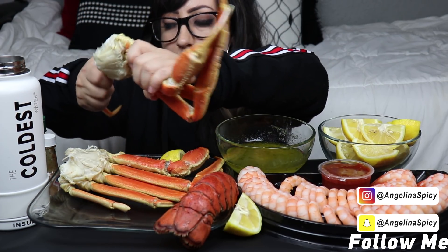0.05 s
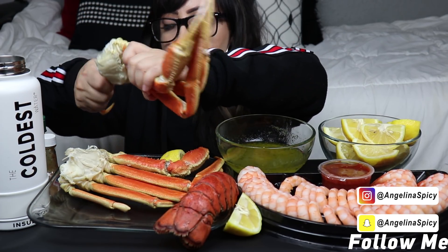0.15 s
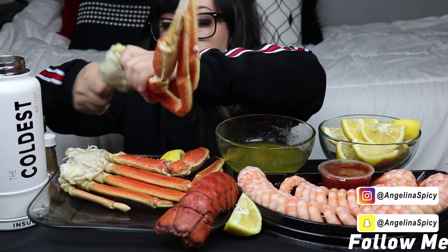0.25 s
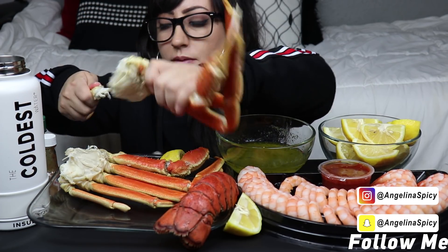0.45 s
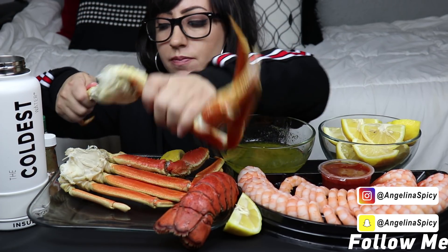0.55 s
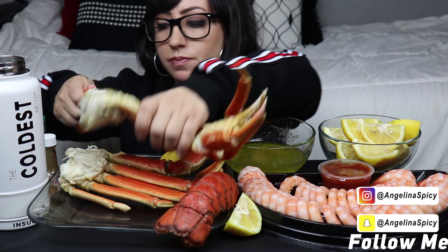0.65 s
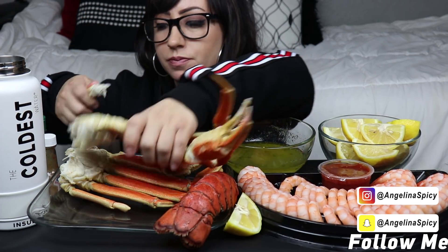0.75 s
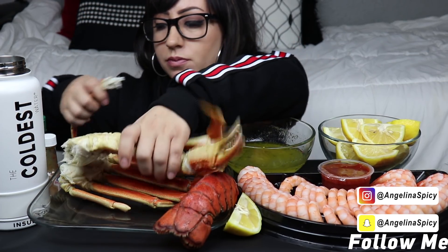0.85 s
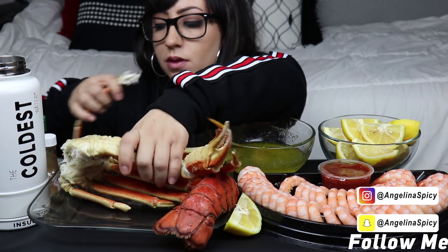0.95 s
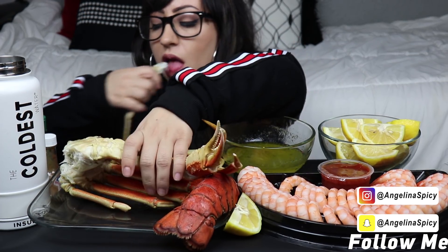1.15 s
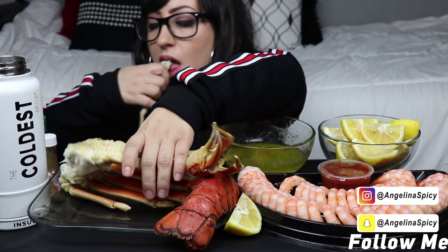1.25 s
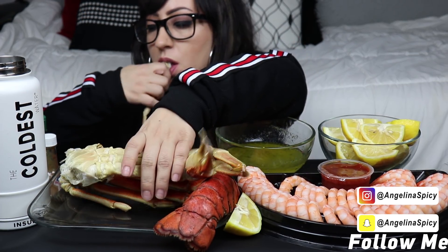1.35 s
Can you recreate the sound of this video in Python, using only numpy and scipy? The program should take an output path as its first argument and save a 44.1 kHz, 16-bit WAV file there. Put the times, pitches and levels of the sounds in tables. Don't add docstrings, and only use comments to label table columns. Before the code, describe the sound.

Crab leg shell being broken by hand, close to the microphone in a soft furnished room. Small ticks start at once, growing from 0.17 seconds into crowded brittle snaps, loudest at 0.34. A dull table knock and low creak follow around 0.4 to 0.6, then near quiet. At 0.93 the leg clacks onto a tray; low rumbling sway, wet rustling and faint ticks continue to 1.4.

```python
import sys
import numpy as np
from scipy import signal
from scipy.fft import rfft, irfft
from scipy.io import wavfile

SR = 44100
rng = np.random.default_rng(int(sys.argv[2]) if len(sys.argv) > 2 else 0)


def elevation(decibels):
    levels = np.asarray(decibels, float)
    return 10 ** (levels / 20)


def materialize(psi):
    bounded = np.clip(np.atleast_2d(psi).T, -1, 1)
    quanta = np.round(bounded * 32767).astype(np.int16)
    wavfile.write(sys.argv[1], SR, quanta)


N = 61739
LEAD = 4410


def rms_one(x):
    return x / np.sqrt(np.mean(x ** 2) + 1e-20)


def in_time(rows):
    return np.interp(np.arange(N) / SR, *np.transpose(rows))


def at_hz(points, hz, axis=1):
    points = np.array(points)
    return np.interp(np.log(np.maximum(hz, 1)), np.log(points[:, 0]), points[:, axis])


def colour(x, points):
    gain = elevation(at_hz(points, np.fft.rfftfreq(len(x), 1 / SR)))
    return rms_one(irfft(rfft(x) * gain, len(x)))


def drift(rate_hz):
    r = np.exp(-2 * np.pi * rate_hz / SR)
    settle = 9000
    return rms_one(signal.lfilter([1], [1, -2 * r, r * r], rng.standard_normal(N + settle))[settle:])


def band_pass(x, low_hz, high_hz):
    return signal.sosfilt(signal.butter(2, [low_hz, high_hz], "band", fs=SR, output="sos"), x)


def add(out, start_s, x):
    i = int(start_s * SR) + LEAD
    out[i:i + len(x)] += x[:len(out) - i]


def ring(t, hz, t60):
    return np.sin(2 * np.pi * hz * t) * elevation(-60 * t / t60)


def snaps():
    # (time [s], peak level [dB], pitch of
    # hollow leg [Hz], bright crack against ring [dB])
    snap_table = [(-.04, -24, 2900, 5), (0.0551, -33, 5270, 4), (0.0653, -48, 4513, 9),
                  (0.0937, -31.5, 3570, 4.5), (0.1297, -51, 4900, 14), (.136, -44.5, 3900, -1),
                  (0.1704, -20.5, 1900, 2.5), (0.165, -42, 4000, 1.5), (0.2115, -15.5, 1840, 3),
                  (.2231, -20.5, 1500, 7), (.245, -14.5, 1476, 2), (.257, -22, 1179, -15),
                  (.2949, -13.5, 1120, 7), (0.2977, -13.5, 1130, 5), (.302, -18.5, 1160, 0),
                  (0.3174, -18, 1296, -12), (.3368, -5.5, 1032, -0.5), (0.3402, -6, 1720, -1),
                  (0.504, -41, 3000, 0), (0.662, -56.5, 1234, 1.5), (.9286, -13, 1346, -9),
                  (0.9364, -26, 4260, -4), (0.9626, -24, 1760, -3.5), (.973, -38, 3900, -16),
                  (1.058, -37, 1900, 1), (1.0917, -40, 1005, -9.5), (1.176, -62, 6000, 8),
                  (1.3238, -42, 4000, 5.5), (1.398, -37.5, 1160, -10)]
    # (frequency [Hz], level [dB], time to die by 60 dB [s])
    wall_modes = [(1900, -4.5, .006), (3033, -5.5, 0.0079), (3706, -0.5, .005), (4463, -1.5, 0.0061),
                  (5210, -5, 0.0044), (6376, 2, .004), (8006, -0.5, 0.0038), (9960, -4.5, 0.0025),
                  (11320, -4.5, 0.0032), (14200, -4, .002)]
    cycles = 9.34
    out, t = np.zeros(N + LEAD), np.arange(2000) / SR
    luck = rng.standard_normal((len(snap_table), 3, len(wall_modes)))
    shape = (len(snap_table), len(t))
    bits = rng.standard_normal(shape) * rng.exponential(1, shape)
    bits = signal.sosfilt(signal.butter(1, 6000, fs=SR, output="sos"), bits)
    for (start_s, db, hz, crack_db), (loud, tune, late), splinters in zip(snap_table, luck, bits):
        x = ring(t, hz, cycles / hz) + elevation(-4) * ring(t, hz * 0.6, cycles / hz)
        x = x + splinters * elevation(crack_db - 14.5 - 60 * t / 0.017)
        for (wall_hz, wall_db, t60), a, b, c in zip(wall_modes, loud, tune, late):
            since = np.maximum(t - .00012 * abs(c), 0)
            strength = np.sign(b) * elevation(crack_db + wall_db - 7.5 + 1.5 * a)
            x = x + strength * ring(since, wall_hz * (1 + 0.048 * b), t60)
        add(out, start_s, -elevation(db) * x)
    return signal.sosfilt(signal.butter(6, 798, "high", fs=SR, output="sos"), out)


def echoes(x):
    # (frequency [Hz], time to die by 60 dB [s], level [dB])
    room_bands = [(300, .3, -19.5), (700, 0.3, -18), (1500, 0.32, -9), (3000, 0.39, -8), (6000, 0.38, -10),
                  (10000, 0.24, -6.5), (15000, 0.37, -12)]
    t, edges = np.arange(SR // 2) / SR, 200 * 2 ** np.arange(0, 6.6, .5)
    white = rng.standard_normal((2, len(t)))
    response = 0
    for k, (low, high) in enumerate(zip(edges, edges[1:])):
        hz = np.sqrt(low * high)
        fade_db = at_hz(room_bands, hz, axis=2) - 60 * t / at_hz(room_bands, hz)
        response = response + band_pass(white[k % 2], low, high) * elevation(fade_db)
    diffuse = 1 - np.exp(-np.maximum(t - 0.002, 0) / 0.0063)
    near = elevation(6.5 - 60 * t / .02)
    wall_db = 4.5 * np.exp(-((t - .021) / 0.003) ** 2)
    return signal.fftconvolve(x, response * (diffuse + near) * elevation(wall_db - 22))[:len(x)]


def handling():
    # (time [s], level [dB])
    rustle_level = [(0, -65.5), (.1, -60), (.16, -68), (.2, -73.5), (.78, -81.5), (.84, -68.5), (.88, -56),
                    (.92, -63.5), (1.0, -53.5), (1.08, -62.5), (1.13, -68), (1.17, -78.5), (1.32, -68),
                    (1.36, -57), (1.4, -55)]
    # (frequency [Hz], level [dB per Hz])
    rustle_colour = [(250, -25), (600, -2), (1300, 2), (2500, -7), (4500, -11), (8000, -15), (16000, -25)]
    grains_per_s, spread_db, lumps_db = 3000, 4, 1.2
    sizes = elevation(spread_db * np.minimum(rng.exponential(1, N), 5)) * rng.choice([-1, 1], N)
    grains = sizes * (rng.random(N) < grains_per_s / SR)
    grains = grains + 0.9 * rng.standard_normal(N)
    return elevation(in_time(rustle_level) + lumps_db * drift(30)) * colour(grains, rustle_colour)


def creak():
    # (time [s], level [dB])
    creak_level = [(0, -81), (.15, -71.5), (.33, -70), (.4, -59), (.5, -53), (.62, -53), (.7, -70),
                   (.83, -67.5), (.89, -57.5), (.95, -40), (1.05, -55), (1.25, -59), (1.31, -67),
                   (1.4, -57)]
    return elevation(in_time(creak_level)) * rms_one(band_pass(rng.standard_normal(N), 110, 210))


def floor_noise():
    # (frequency [Hz], level [dB per Hz])
    floor_colour = [(15, -6), (30, -1), (70, -11), (120, -25), (300, -18.5), (550, -26.5), (1200, -29),
                    (16000, -43.5)]
    return elevation(-59.5) * colour(rng.standard_normal(N), floor_colour)


def knocks():
    # (time [s], peak level
    # [dB], pitch [Hz], rise [s], time to die by 60 dB [s])
    knock_table = [(0.081, -47, 252, 0.0013, 0.032), (.112, -43.5, 530, 0.0019, 0.021),
                   (0.24, -44.5, 418, 0.0008, 0.027), (.2955, -29, 420, 0.00045, .014),
                   (0.335, -24.5, 749, .0005, .01), (0.3374, -15, 4234, .0002, .008),
                   (0.3368, -30.5, 369.4, .001, .03), (.3915, -27, 280, .001, .03),
                   (.408, -43, 300, .004, .2), (.486, -44, 450, .002, .03),
                   (.488, -45, 700, 0.00067, 0.041), (.49, -45, 55, 0.018, 0.34),
                   (.497, -27, 203, .009, .14), (.532, -38, 168, .008, .2),
                   (.612, -46.5, 528, 0.0015, 0.022), (.7, -53, 300, 0.008, 0.13),
                   (.84, -50, 532, 0.0013, 0.028), (.925, -37, 60, .015, .2),
                   (.9287, -33, 3800, .0002, .005), (.9315, -26, 140, .005, .09),
                   (.9455, -23, 1400, .003, .03), (0.977, -47, 1380, 0.0049, 0.04),
                   (1.057, -44, 805, 0.00093, .03), (1.369, -44.5, 175, 0.011, 0.24)]
    out, t = np.zeros(N + LEAD), np.arange(12000) / SR
    for start_s, db, hz, rise_s, t60 in knock_table:
        add(out, start_s, elevation(db) * (1 - np.exp(-t / rise_s)) * ring(t, hz, t60))
    return out


def whistles():
    # (start [s], length [s], pitch [Hz], level [dB])
    whistle_table = [
        (.63, .06, 8400, -78),
        (.7, .06, 6050, -75),
        (.69, .12, 4050, -80),
        (.8, .05, 8400, -79),
        (.62, .05, 11000, -83),
    ]
    out = np.zeros(N + LEAD)
    for start_s, length_s, hz, db in whistle_table:
        t = np.arange(int(length_s * SR)) / SR
        wobble = np.cumsum(rng.standard_normal(9000))[:len(t)] * .03
        swell = np.sin(np.pi * t / length_s)
        add(out, start_s, elevation(db) * swell * np.sin(2 * np.pi * hz * t + wobble))
    return out[LEAD:]


def sway():
    # (time [s], level [dB])
    sway_level = [
        (.975, -41),
        (1.0, -47),
        (1.035, -34),
        (1.13, -33.5),
        (1.19, -41.5),
        (1.35, -41.5),
        (1.4, -46),
    ]
    hz, phase = 29.15, 3.35
    silence = (sway_level[0][0] - .03, -90)
    strength = elevation(in_time([silence] + list(sway_level)) + 4)
    return strength * np.sin(2 * np.pi * hz * (np.arange(N) / SR - 1.1) + phase)


def scene():
    hits = snaps() + knocks()
    sheltered = np.arange(len(hits)) > .9 * SR + LEAD
    sent = hits * elevation(-4.5 * sheltered)
    hits = (hits + echoes(sent))[LEAD:]
    return (hits + handling() + creak() + floor_noise() + whistles() + sway())[None]


def low_pass(x):
    return signal.sosfilt(signal.butter(12, 16980, fs=SR, output="sos"), x)


def record(dry):
    step = signal.sosfilt(signal.ellip(4, .5, 22, 15750, fs=SR, output="sos"), dry)
    mix = signal.sosfilt(signal.cheby2(10, 50, 17100, fs=SR, output="sos"), step)
    return low_pass(mix)


dry = scene()
out = record(dry)
materialize(out)
```